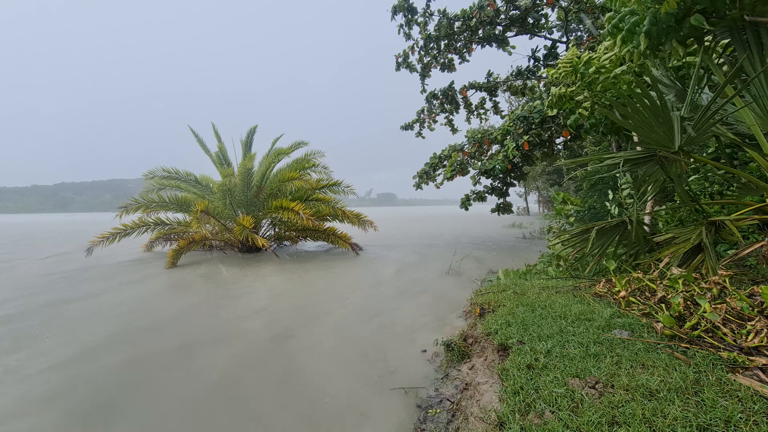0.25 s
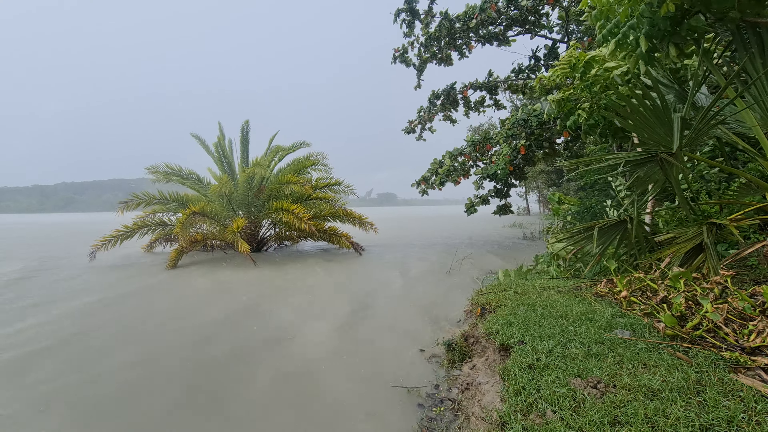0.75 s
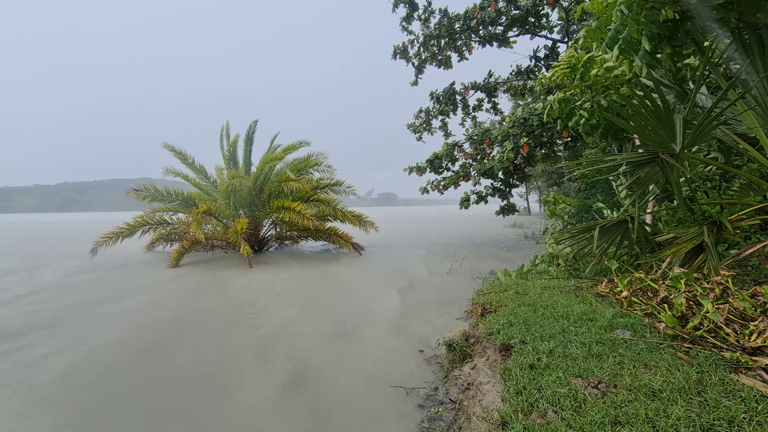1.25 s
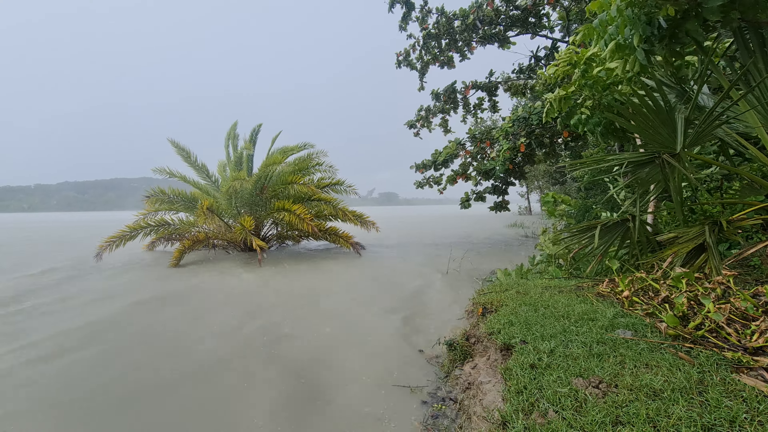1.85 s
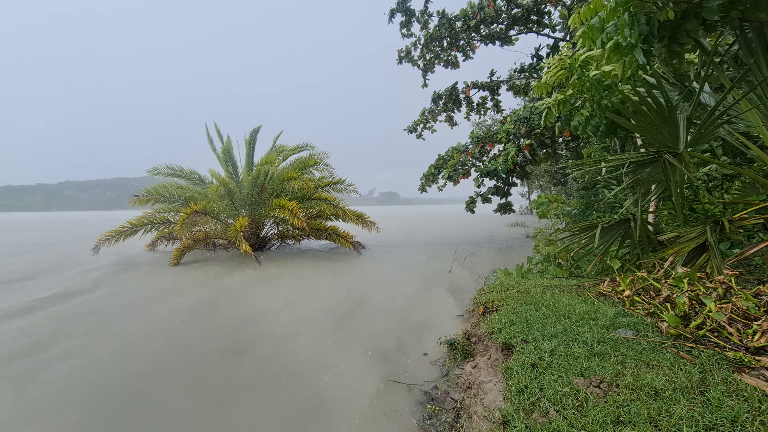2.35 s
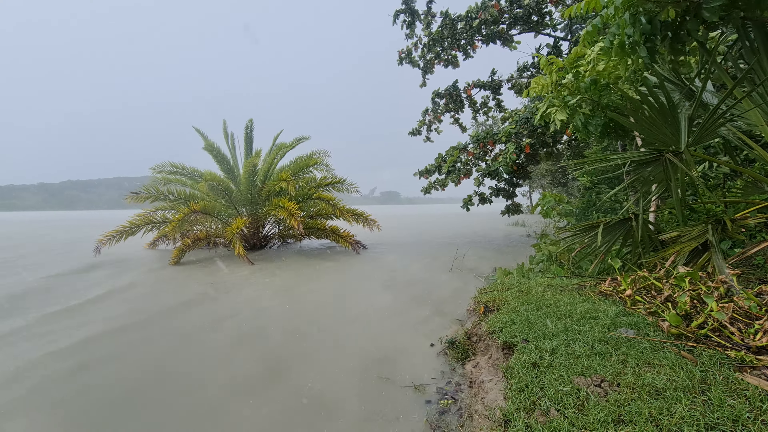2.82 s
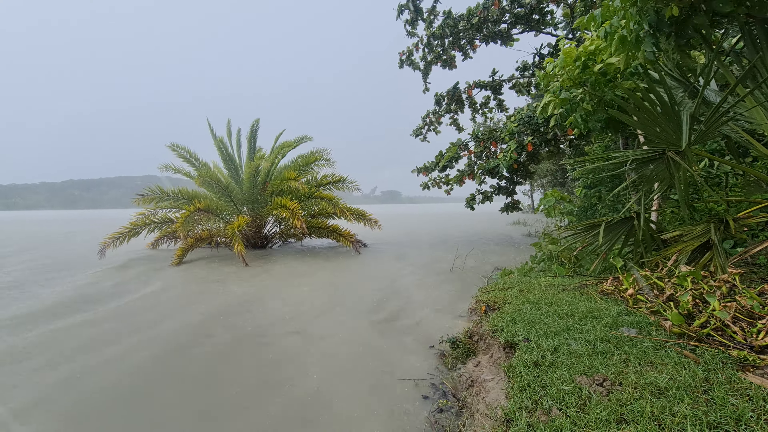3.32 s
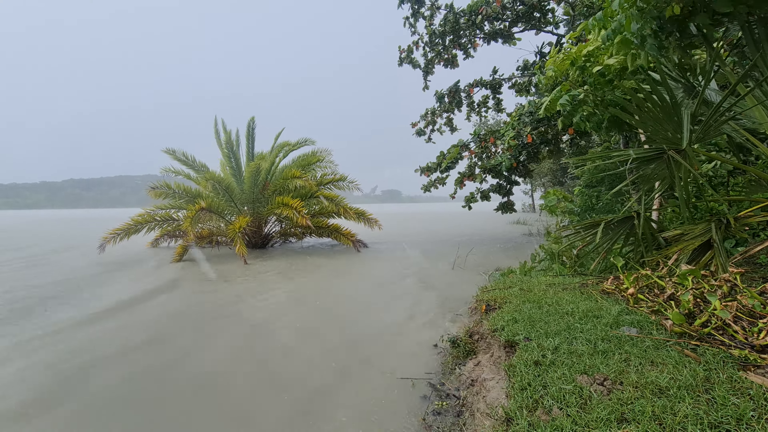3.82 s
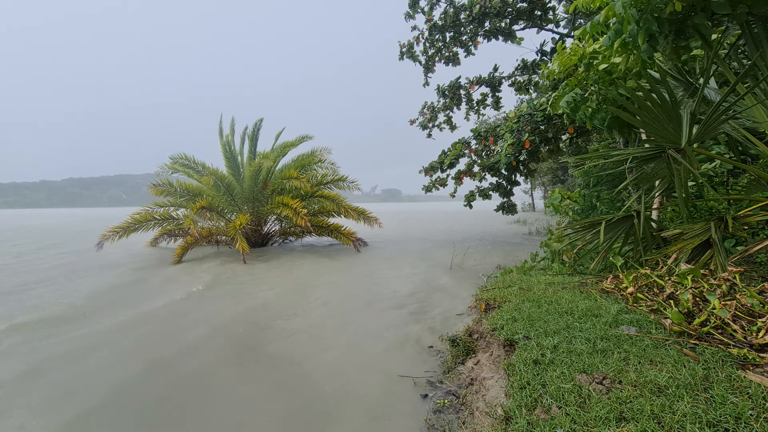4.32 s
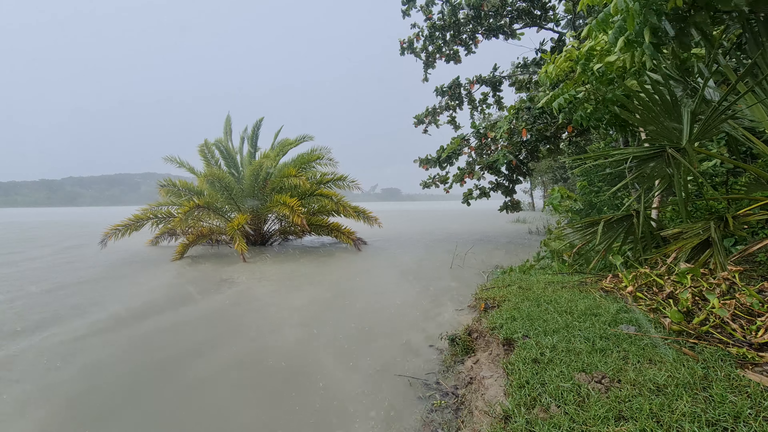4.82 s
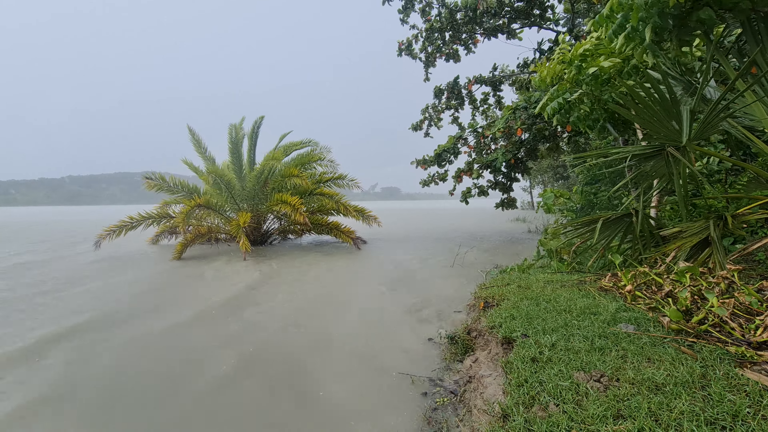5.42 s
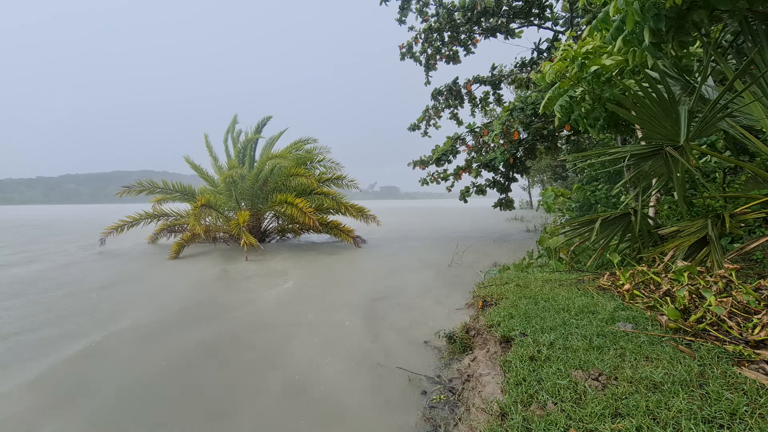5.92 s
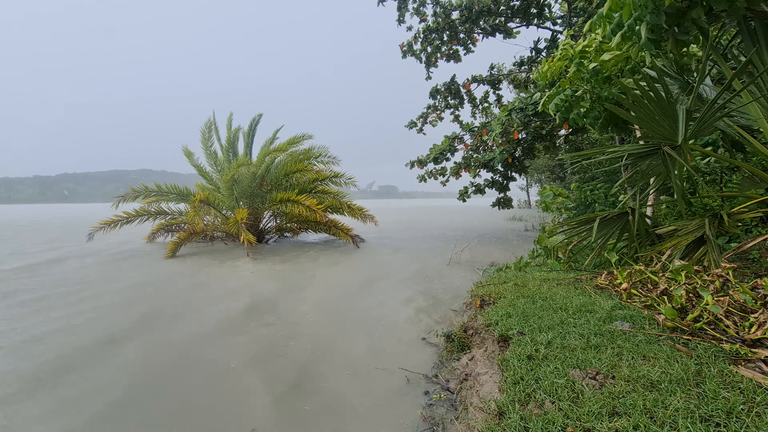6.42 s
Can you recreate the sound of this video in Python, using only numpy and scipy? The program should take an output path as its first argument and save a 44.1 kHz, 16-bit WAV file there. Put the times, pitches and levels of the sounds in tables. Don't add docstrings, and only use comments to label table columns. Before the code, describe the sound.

For about 6.7 seconds, steady rain falls on a wide river, grassy bank and leaves. A dense, airy hiss runs throughout, strongest in the mids and softer on top, with fine close patter inside it. Soft wind gusts push on the microphone as a low, uneven rumble and flutter, with a brief stronger bump near 1.8 s. Crisp drops tap the housing at 0.2 to 0.35 s, then sparser ones follow; around 2.3 s the rain thickens a little. Sharp taps and dull thuds gather from 3.0 to 3.5 s. A dense flurry of knocks comes between 4.75 and 5.4 s, many toward the left, as the rain briefly swells. It then eases slightly, with a strong tap at 6.2 s and a few more before the end. Tiny bright ticks and faint stray drops are scattered throughout. The stereo is wide, dry and open, without echo.

```python
import sys
import numpy as np
from scipy import signal
from scipy.fft import rfft, irfft, next_fast_len
from scipy.io import wavfile
from scipy.ndimage import uniform_filter1d

SR = 44100
rng = np.random.default_rng(int(sys.argv[2]) if len(sys.argv) > 2 else 0)


def linear_from_db(decibels):
    return 10 ** (np.asarray(decibels, float) / 20)


def wrap_up_sound(samples):
    columns = np.atleast_2d(samples).T
    tamed = np.clip(columns, -1, 1)
    steps = np.round(tamed * 32767).astype(np.int16)
    wavfile.write(sys.argv[1], SR, steps)


N = 293690
SIZE = next_fast_len(N, real=True)
HZ = np.fft.rfftfreq(SIZE, 1 / SR)
TIME = np.arange(N) / SR
SLOW = 64

# f/Hz, likeness/0-1, phase of right over left/rad
PORT_LIKENESS = [(400, 0.17, 3.6), (560, 0.33, 1.47), (900, 0.6, 3.2), (1440, 0.61, 3.1),
                 (1484, 0.71, 3.15), (2060, 0.22, 4.5), (2540, 0, 1.85), (3800, 0.3, 3.8),
                 (4300, 0.01, 5.1)]


def evened(x):
    return x / np.sqrt(np.mean(x ** 2) + 1e-20)


def read(points, hz, column=1):
    rows = np.transpose(points)
    return np.interp(np.log(hz + 1), np.log(rows[0] + 1), rows[column])


def curve(rows, column):
    rows = np.transpose(rows)
    return np.interp(TIME, rows[0], rows[column])


def colour(x, gain):
    return irfft(rfft(x, SIZE) * gain, SIZE)[..., :N]


def swells(rows, column, linger=1.0):
    rise_over_fall = 1.49
    fall_db = 12
    away = np.arange(0, N, SLOW) / SR - rows[:, :1]
    span = linger * np.abs(rows[:, 2:3]) * np.where(away < 0, rise_over_fall, 1)
    return linear_from_db(rows[:, column, None] - fall_db * (np.abs(away) / span) ** 1.21) ** 2


def spread(slow):
    return np.interp(np.arange(N), np.arange(0, N, SLOW), slow)


def held(shape):
    x = colour(rng.standard_normal(N), linear_from_db(read(shape, HZ)))
    slow_power = uniform_filter1d(uniform_filter1d(x ** 2, size=2000), size=2000)
    return evened(x / np.sqrt(slow_power))


def buffet(thump, flutter, thump_db=4.0, flutter_db=4.5):
    # f/Hz, level per Hz/dB
    thump_colour = [(15, -34), (49, 2), (70, 5), (110, -5.5), (160, -23), (300, -50.5)]
    # f/Hz, level per Hz/dB
    flutter_colour = [(80, -14), (130, -1.5), (200, -6), (304, -16), (500, -27.5), (900, -83)]
    lumps = uniform_filter1d(uniform_filter1d(rng.standard_normal(N), size=800), size=800)
    lumps = np.tanh(evened(lumps))
    late_lumps = np.roll(lumps, 900)
    deep = evened(held(thump_colour) * linear_from_db(thump_db * lumps))
    flapping = evened(held(flutter_colour) * linear_from_db(flutter_db * late_lumps))
    return thump * deep + flutter * flapping


def wind():
    # t/s, thump level/dB, length/s, flutter level/dB
    gust_rows = [(0.055, -29, .16, -27), (0.252, -28, 0.21, -36.5), (0.404, -31.5, 0.032, -35),
                 (0.546, -30, 0.046, -43), (0.672, -31.5, 0.1, -38.5), (0.85, -32, 0.063, -55),
                 (1.185, -27.5, .1, -38.5), (1.34, -43, 0.1, -33), (1.437, -30.5, 0.17, -43),
                 (1.66, -29.5, 0.066, -34), (1.762, -20, 0.045, -27.5), (1.98, -29.5, 0.093, -46),
                 (2.22, -30.5, 0.13, -38.5), (2.438, -25.5, 0.088, -33), (2.615, -27.5, 0.11, -39.5),
                 (2.947, -26.5, 0.026, -34.5), (3.285, -25, 0.044, -37.5), (3.404, -29.5, 0.054, -39.5),
                 (3.6, -24, 0.062, -40), (3.808, -34, 0.11, -47), (4.277, -25, 0.098, -33.5),
                 (4.565, -26.5, 0.11, -50), (4.822, -35, 0.1, -41), (5.033, -37, 0.078, -42),
                 (5.307, -29.5, 0.36, -39), (5.615, -28.5, 0.27, -36), (5.907, -25.5, 0.045, -45),
                 (6.083, -29, 0.056, -45), (6.3, -26, 0.11, -33.5), (6.575, -26.5, 0.29, -36)]
    # t/s, level/dB, length/s, lean left over right/dB
    eddy_rows = [(0.307, -26, 0.055, -1), (0.48, -33, 0.1, 2), (0.705, -31.5, .2, -0.5),
                 (1.112, -35, .15, -1), (1.472, -33, .05, -3), (1.67, -36, 0.092, -2),
                 (1.766, -25, 0.019, 9), (2.0, -29, 0.054, 1), (2.225, -37, 0.087, -2),
                 (2.377, -31, 0.029, -2), (2.64, -29, 0.11, 0.5), (2.84, -32, 0.23, 1),
                 (3.305, -33, .12, 2), (3.566, -25, 0.051, 2), (4.224, -29, 0.073, 7),
                 (4.556, -23, 0.058, 0.5), (4.88, -33, 0.16, 0.5), (5.397, -29.5, 0.31, 0.5),
                 (5.74, -34, 0.091, 2), (6.01, -30, .12, -0.5), (6.223, -26, 0.084, 2.5),
                 (6.368, -32, .04, 2), (6.54, -33, 0.036, 0), (6.65, -29, 0.037, -1.5)]
    lull_db, lull_flutter_db, lull_eddy_db = -39.5, -48, -43
    gusts, eddies = np.array(gust_rows), np.array(eddy_rows)
    thump_power = swells(gusts, column=1).sum(0)
    thump = np.sqrt(spread(thump_power) + linear_from_db(lull_db) ** 2)
    flutter_power = swells(gusts, column=3, linger=0.94).sum(0)
    flutter = np.sqrt(spread(flutter_power) + linear_from_db(lull_flutter_db) ** 2)
    each = swells(eddies, column=1)
    eddy_power = each.sum(0) + linear_from_db(lull_eddy_db) ** 2
    lean = np.tanh(spread(eddies[:, 3] @ each / eddy_power) / 6.2)
    common = buffet(thump, flutter)
    unrelated = buffet(thump, linear_from_db(3.5) * flutter)
    ratio = np.sqrt(spread(eddy_power)) / thump
    apart = ratio * (np.sqrt(1 - lean ** 2) * unrelated + lean * common)
    return np.array([common + apart, common - apart])


def guard(x, edge_hz=950):
    # t/s, length/s, level of the left-right difference/dB
    closings = [
        (0.0, 0.27, -12),
        (0.95, 0.097, -14),
        (1.71, .03, 4),
        (1.796, .04, 2),
        (2.2, 0.034, -3),
        (5.07, 0.091, -17),
        (5.6, 0.12, -7),
        (6.267, .04, -6),
        (6.41, 0.1, -4),
    ]
    glide_s = 0.037
    mid, side = (x[0] + x[1]) / 2, (x[0] - x[1]) / 2
    lows = colour(side, 1 / (1 + (HZ / edge_hz) ** 8))
    shut_db = sum(db * ((TIME >= s) & (TIME < s + length)) for s, length, db in closings)
    shut_db = uniform_filter1d(shut_db, int(glide_s * SR))
    side = side + lows * (linear_from_db(np.minimum(shut_db, 0)) - 1)
    return np.array([mid + side, mid - side])


def far_wash(patchy_db=1.0, flicker_db=0.3):
    frames = N // 64 + 9
    a, b, patches = rng.standard_normal((3, frames, 129, 3)).T
    patches = uniform_filter1d(uniform_filter1d(patches, size=8, axis=0), size=50, axis=1)
    flicker = uniform_filter1d(rng.standard_normal((3, 1, frames)), size=6, axis=2)
    patchy = (a + 1j * b) * linear_from_db(patchy_db * evened(patches))
    z = patchy.transpose(2, 0, 1) * linear_from_db(flicker_db * evened(flicker))
    return evened(signal.istft(z, nperseg=256, noverlap=192)[1][:, :N])


def splat(hz, ms, phase, size=100):
    t = np.arange(-size, 2 * size) / SR
    bell = np.exp(-.5 * (t / (ms * 0.0011 * np.where(t < 0, .4, .6))) ** 2)
    blow = bell * np.cos(2 * np.pi * hz * t + phase)
    return blow - bell * blow.sum() / bell.sum()


def patter(per_s=1500, spread_db=6.0, fine_spread_db=2.5):
    rare = np.minimum(rng.exponential(1, (3, N)), 4.5)
    lands = rng.random((3, N)) < per_s / SR
    sign = rng.choice([-1, 1], (3, N)) * lands
    kind = rng.integers(0, 12, (3, N))
    out = np.zeros((3, N))
    spreads_db = np.linspace(spread_db, fine_spread_db, num=12)
    for k, hz in enumerate(np.geomspace(400, 15000, num=12)):
        grain = splat(hz, min(900 / hz, .8) + 0.068, rng.uniform(0, 2 * np.pi))
        train = np.zeros((3, N))
        at = (kind == k) & (sign != 0)
        train[at] = sign[at] * linear_from_db(spreads_db[k] * rare[at])
        power = np.sqrt(hz) / np.linalg.norm(grain)
        out += signal.oaconvolve(evened(train), power * grain[None], axes=1)[:, :N]
    return evened(out)


def rain():
    # t/s, level/dB
    strength = [(0.0, -37.5), (0.31, -36.5), (1.5, -37), (2.34, -34.5), (4.4, -36.5), (4.84, -34),
                (5.14, -35), (5.51, -37), (5.92, -36.5), (6.19, -38), (6.66, -37.5)]
    # f/Hz, level per Hz/dB
    left_colour = [(340, -4), (430, -8), (740, -1.5), (940, -4.5), (1420, 1.5), (2060, -2), (4770, -7),
                   (6700, -9), (8520, -11.5), (9230, -19.5), (9600, -21.5), (14760, -16.5), (15900, -17.5)]
    # f/Hz, level per Hz/dB
    right_colour = [(340, -4), (690, -0.5), (990, -2.5), (1380, 2), (2100, -1), (3360, -1), (5220, -9),
                    (6840, -6), (7120, -8), (8020, -19), (10100, -18.5), (12840, -15.5), (15900, -20)]
    left, right, shared = rfft(far_wash() + linear_from_db(-7.5) * patter(), SIZE)
    same = np.clip(read(PORT_LIKENESS + [(6000, 0.024, 0)], HZ), 0, .99)
    turn = np.exp(1j * read(PORT_LIKENESS, HZ, column=2))
    own, both = np.sqrt(1 - same), np.sqrt(same)
    low_cut = (HZ / 260) ** 2 / np.sqrt(1 + (HZ / 260) ** 4)
    at_left = (own * left + both * shared) * linear_from_db(read(left_colour, HZ))
    at_right = (own * right + both * shared * turn) * linear_from_db(read(right_colour, HZ))
    ports = irfft(np.array([at_left, at_right]) * low_cut, SIZE)[:, :N]
    return evened(ports) * linear_from_db(curve(strength, column=1) + 5.0)


def strays(count, top_db, range_db, low_hz, high_hz, ms):
    when, size, pitch, long, side = rng.random((count, 5)).T
    return np.transpose([0.018 + when * (N / SR - .04), top_db - range_db * size,
                         low_hz * (high_hz / low_hz) ** pitch, ms * (.7 + 0.55 * long), 20 * side - 10])


def strikes(rows, crack_db, spatter_db, far_db, far_sign, size=100):
    out = np.zeros((2, N + 3 * size))
    for (s, db, hz, ms, pan_db), chance in zip(rows, rng.random((len(rows), 8))):
        blow = splat(hz, ms, 2 * np.pi * chance[0], size=size)
        blow += linear_from_db(crack_db) * splat(2.26 * hz, .5 * ms, 2 * np.pi * chance[1], size=size)
        for lag, pitch in chance[2:].reshape(3, 2):
            late = splat(hz * (.7 + .8 * pitch), 0.5 * ms, 20 * pitch, size=size)
            blow += linear_from_db(spatter_db - 3.0 * lag) * np.roll(late, int(size * lag))
        at = round(s * SR) - size
        near = int(pan_db < 0)
        out[near, at:at + len(blow)] += linear_from_db(db) * blow
        out[1 - near, at:at + len(blow)] += far_sign * linear_from_db(db - abs(pan_db) + far_db) * blow
    return out[:, :N]


def widen(x, leak_db=-11):
    likeness = read(PORT_LIKENESS + [(6000, .03, 0)], HZ)
    feed = linear_from_db(leak_db) * likeness * np.exp(1j * read(PORT_LIKENESS, HZ, column=2))
    return x + np.array([colour(x[1], feed.conj()), colour(x[0], feed)])


def housing_drops():
    # t/s, peak level/dB, f/Hz, length/ms, left over right/dB
    tap_rows = [(0.2179, -10, 2310, 0.21, -15), (0.2759, -6, 2140, 0.16, -0.5), (0.343, -3, 1970, 0.15, 2),
                (1.428, -14, 1480, 1.04, 13), (2.5141, -11.5, 1560, 1.0, 9), (2.9843, -4, 2760, 0.16, 13),
                (3.0764, -19, 2930, 0.51, 1), (3.1881, -14, 900, 0.41, -8), (3.3483, -6, 1760, 0.32, 9),
                (3.3862, -7, 3100, 0.17, 11), (3.4712, -13.5, 1400, 1.1, 13), (4.7591, -3.5, 1850, 0.36, 4),
                (4.8145, -7, 2240, 0.21, -15), (4.8398, -4.5, 2620, 0.57, 17),
                (4.8937, -12, 1750, 0.65, -11), (5.0372, -9, 1820, 0.23, -4), (5.1079, -18, 1690, 0.87, 9),
                (5.2032, -6, 1810, 0.2, 13), (5.3568, -5, 870, 0.28, 9), (5.7428, -8, 2220, 0.14, 12),
                (6.2215, -1.5, 1540, 0.27, 12), (6.3386, -11, 1550, 0.21, 9), (6.4956, -8.5, 2700, 0.15, 7),
                (6.6042, -16, 1590, 0.44, 10)]
    # t/s, peak level/dB, f/Hz, left over right/dB
    tick_rows = [(0.6567, -29, 13230, -11), (1.0329, -26, 14440, 5), (1.2372, -22, 13470, -6),
                 (1.5836, -21, 14470, -15), (2.772, -29, 11460, -6), (2.8033, -19, 14800, 9),
                 (2.9844, -27, 13190, 11), (3.1885, -26, 13140, -13), (3.7915, -26, 10950, 10),
                 (3.8141, -28, 14060, -18), (4.7592, -12, 13600, 15), (4.84, -23, 11280, 10),
                 (5.6463, -27, 13450, -8), (6.0678, -20, 12510, -7), (6.4957, -28, 11340, 10)]
    # t/s, peak level/dB, f/Hz,
    # length/ms, left over right/dB
    thud_rows = [(0.012, -20.5, 344, 6.8, 13), (0.9823, -22, 530, 1.1, -14), (1.1848, -22, 400, 2.7, -3),
                 (1.3623, -22, 350, 6.8, 0), (2.6318, -30, 390, 1.5, -11), (2.679, -22, 340, 1.9, 5),
                 (2.703, -28, 750, 3.2, -5), (2.985, -22, 560, 1.8, 0), (3.1888, -13, 546, 1.3, -5),
                 (3.386, -14.5, 425, 2, 4), (3.5196, -21.5, 480, 1.4, -13), (3.5922, -27.5, 330, 13, 9),
                 (3.69, -28.5, 670, 8, 13), (4.2314, -25, 300, 1.7, 0), (4.4273, -23, 540, 1.4, -13),
                 (4.7598, -16, 543, 2, 1), (5.3574, -22, 750, 2.5, 0), (6.2213, -21.5, 635, 4.3, -0.5),
                 (6.3608, -23, 322, 3.6, -1)]
    tick_ms = 0.33
    taps = [*tap_rows, *strays(count=30, top_db=-14, range_db=8, low_hz=900, high_hz=3500, ms=0.32)]
    ticks = [(s, db, hz, tick_ms, pan) for s, db, hz, pan in tick_rows]
    ticks += [*strays(count=26, top_db=-28, range_db=1, low_hz=11500, high_hz=15000, ms=.28)]
    thuds = [*thud_rows, *strays(count=16, top_db=-21, range_db=10, low_hz=284, high_hz=720, ms=0.96)]
    drops = widen(strikes(taps, crack_db=-9.5, spatter_db=-6, far_db=-13, far_sign=-0.62))
    drops += linear_from_db(-3) * strikes(ticks, crack_db=-60, spatter_db=-8, far_db=-6, far_sign=1, size=50)
    drops += strikes(thuds, crack_db=-30, spatter_db=-9, far_db=-2.8, far_sign=-0.68, size=500)
    return drops


def scene():
    return guard(rain() + wind()) + housing_drops()


def low_pass(x):
    return signal.sosfilt(signal.butter(12, 15950, fs=SR, output="sos"), x)


def record(dry):
    edge_hz = 15950
    mix = colour(dry, HZ < edge_hz)
    return low_pass(mix)


dry = scene()
out = record(dry)
wrap_up_sound(out)
```